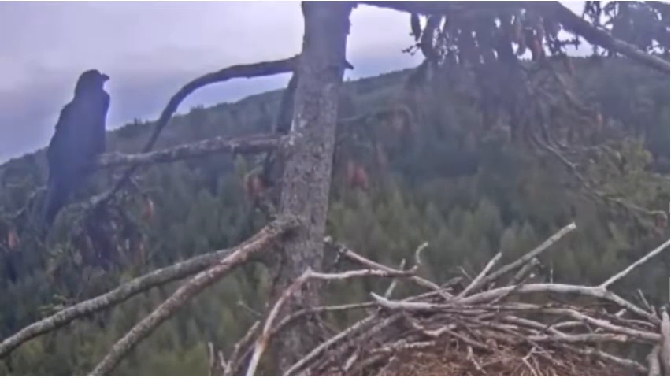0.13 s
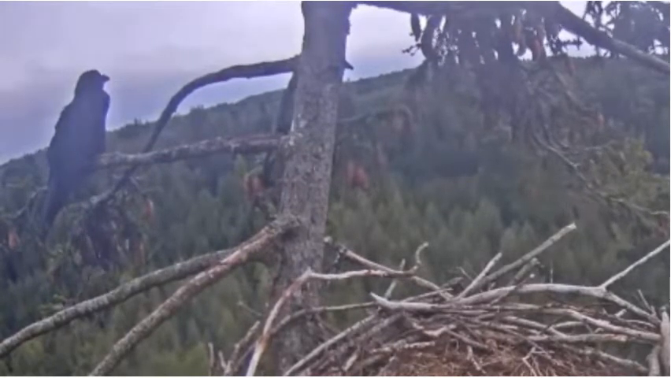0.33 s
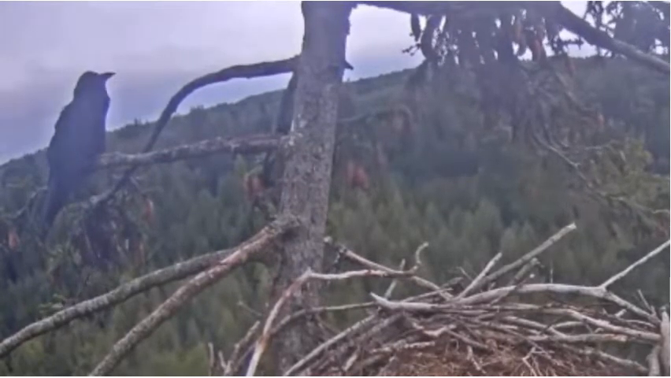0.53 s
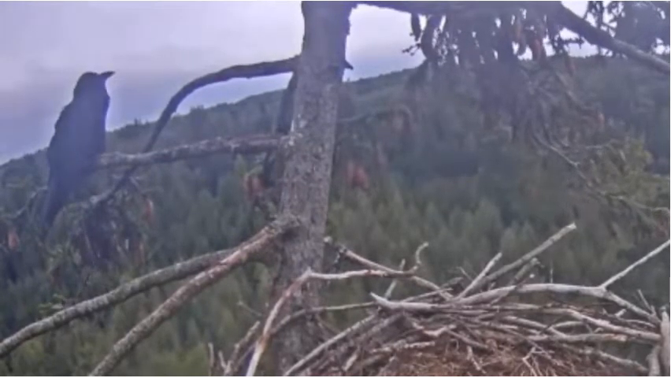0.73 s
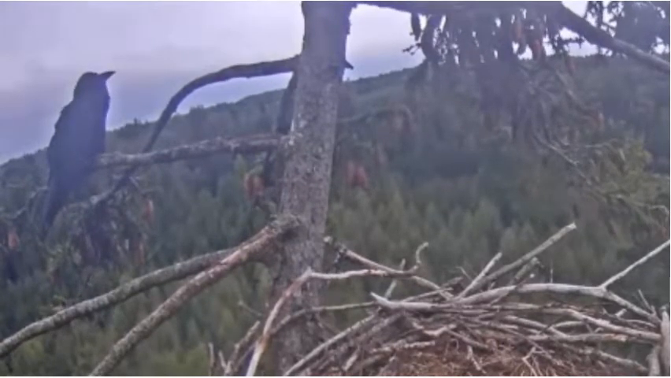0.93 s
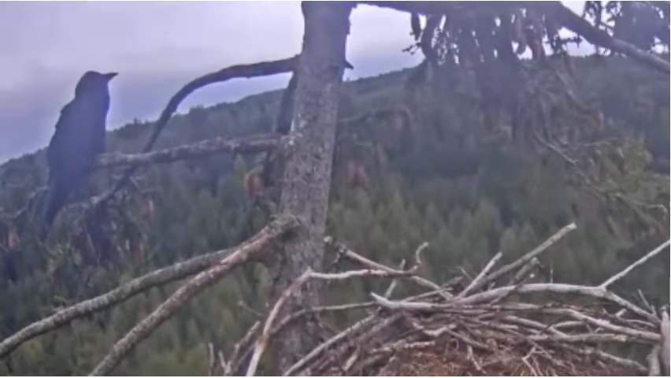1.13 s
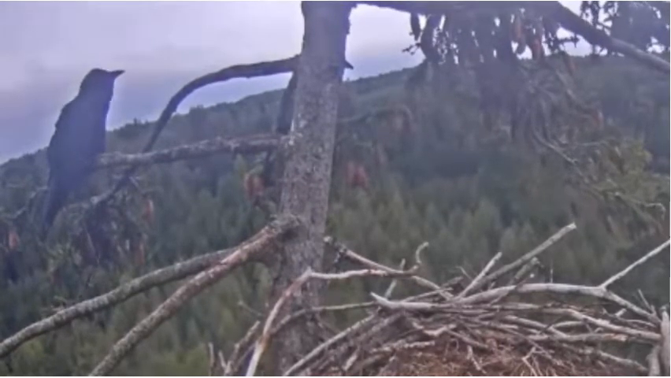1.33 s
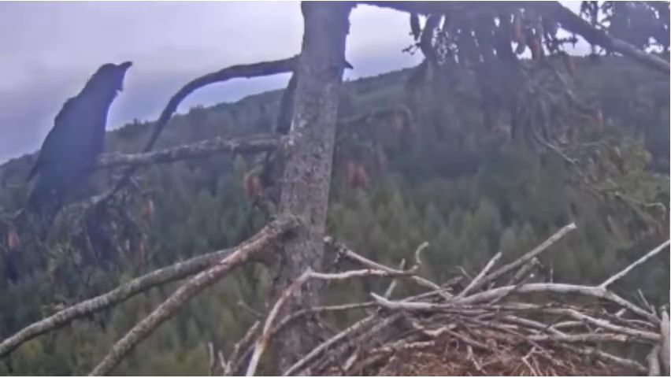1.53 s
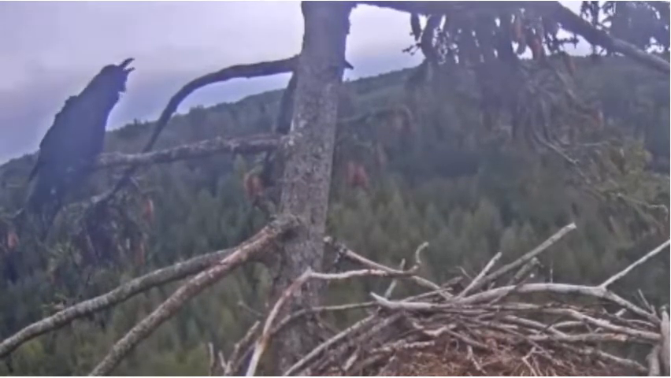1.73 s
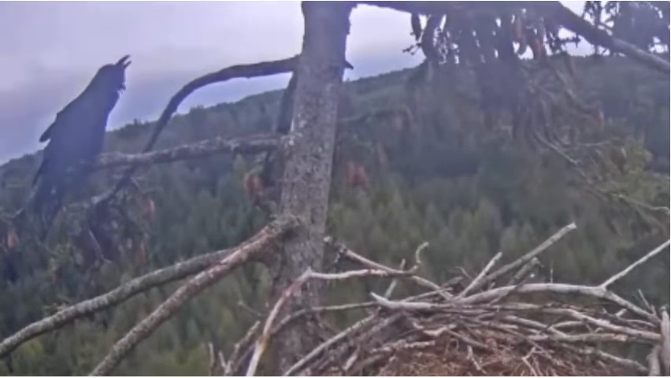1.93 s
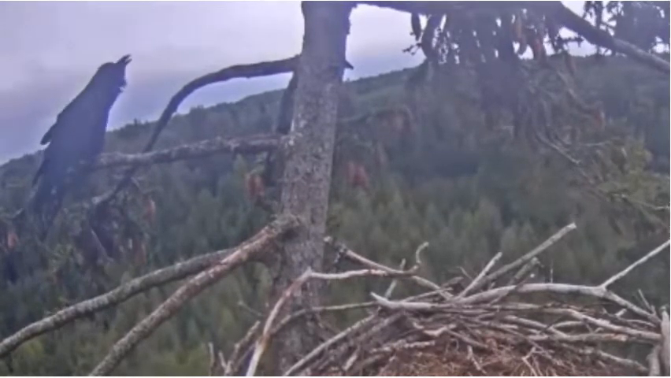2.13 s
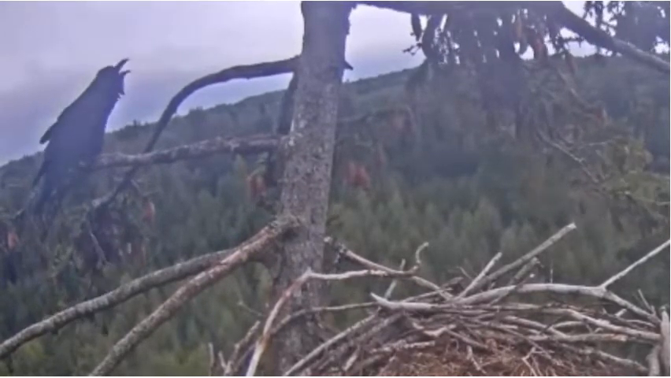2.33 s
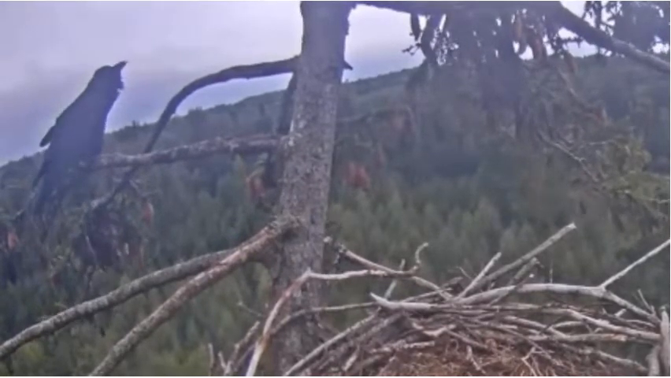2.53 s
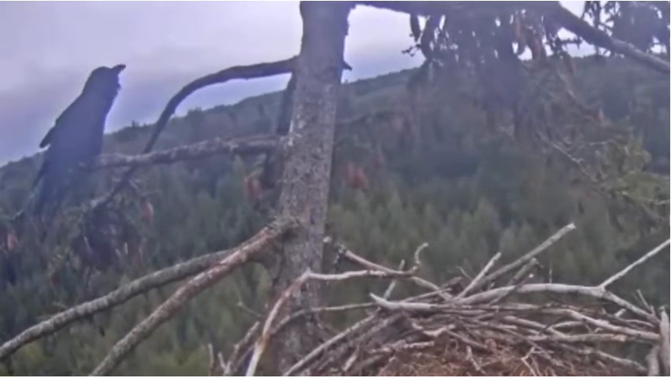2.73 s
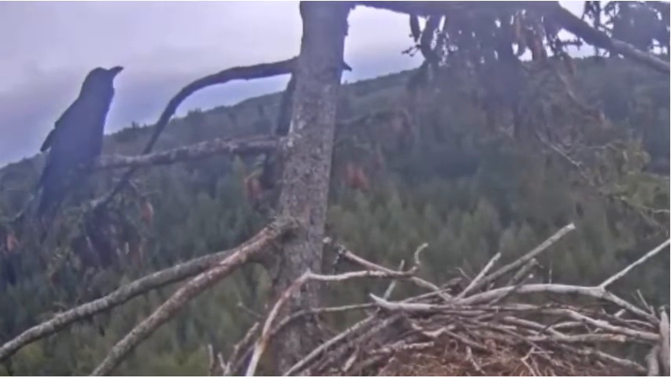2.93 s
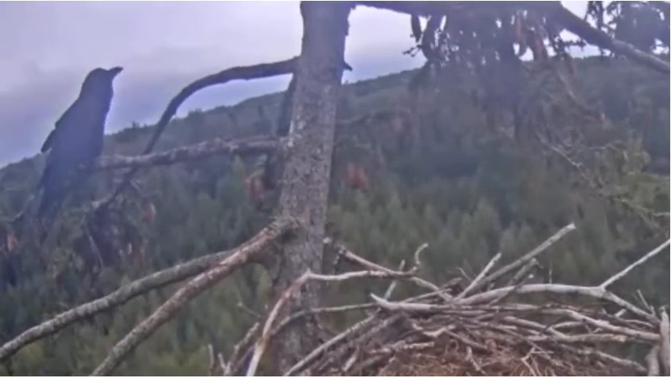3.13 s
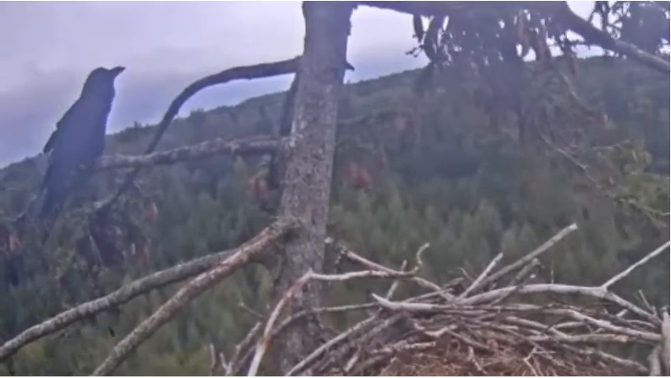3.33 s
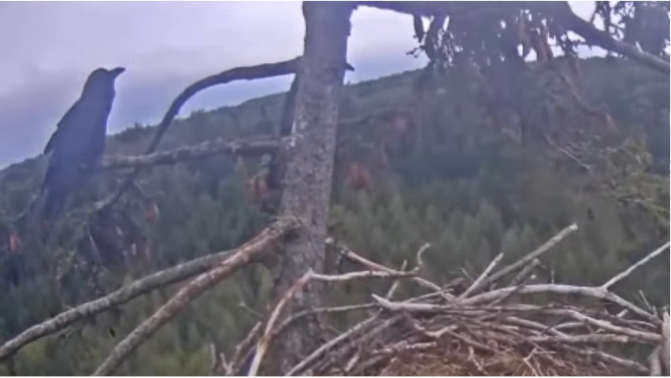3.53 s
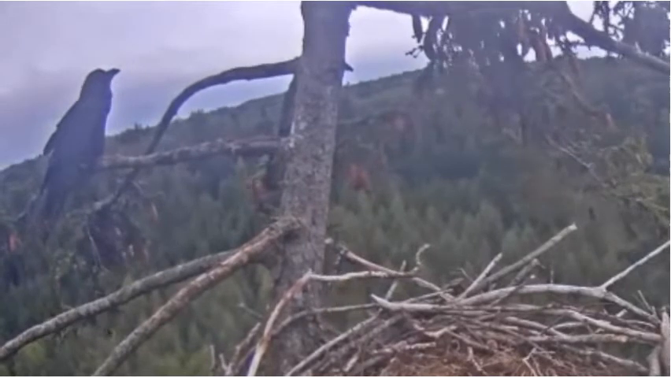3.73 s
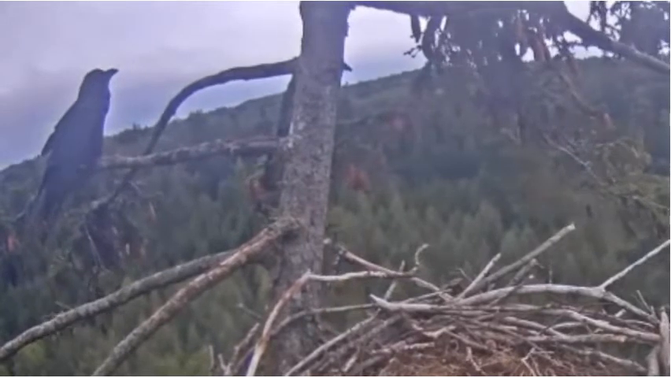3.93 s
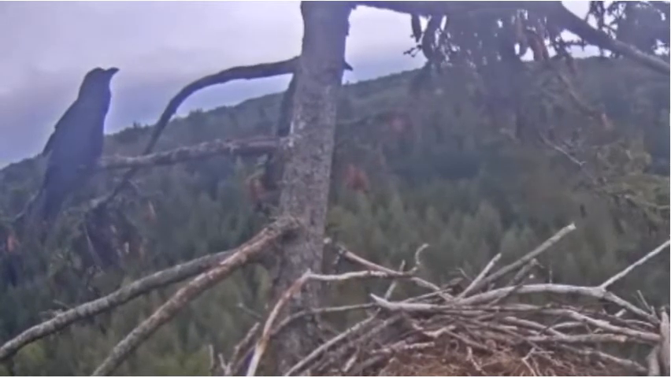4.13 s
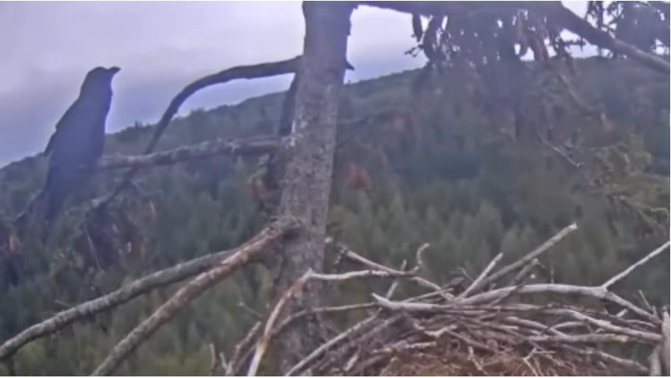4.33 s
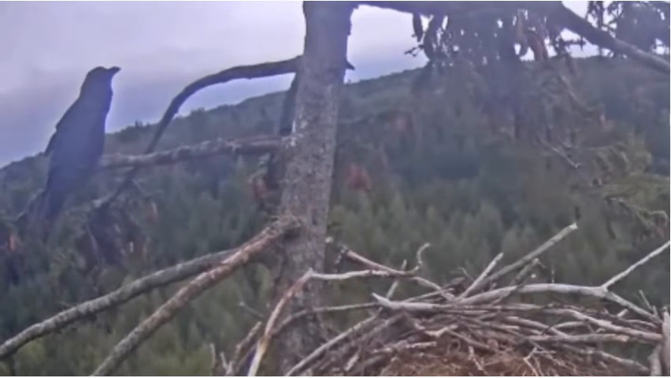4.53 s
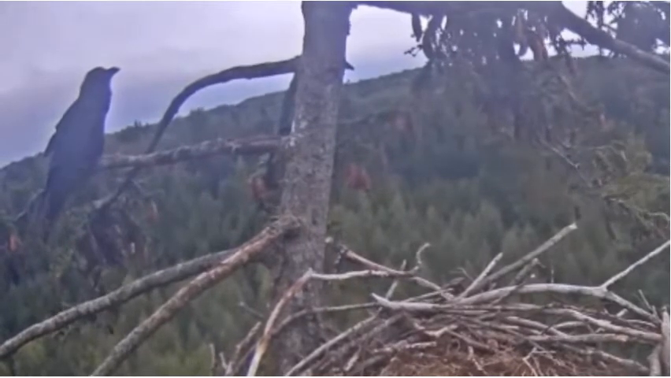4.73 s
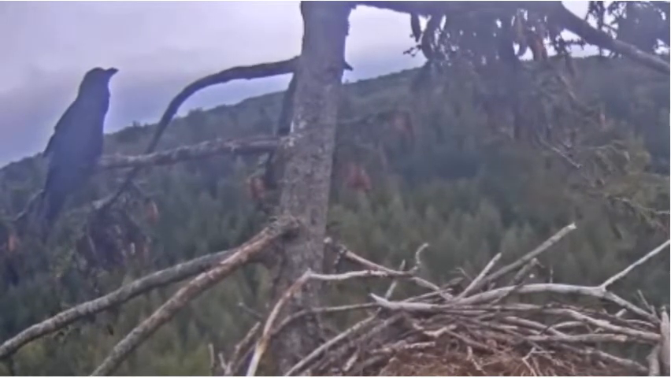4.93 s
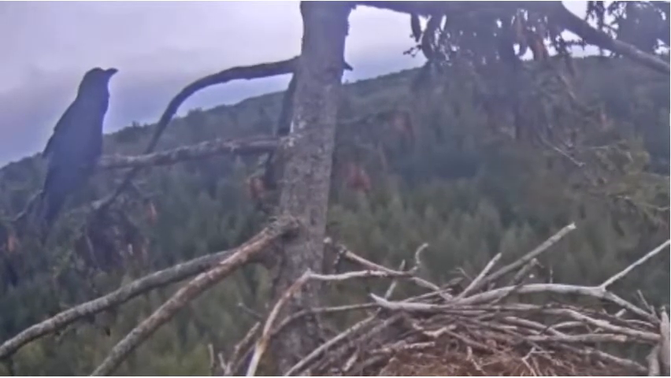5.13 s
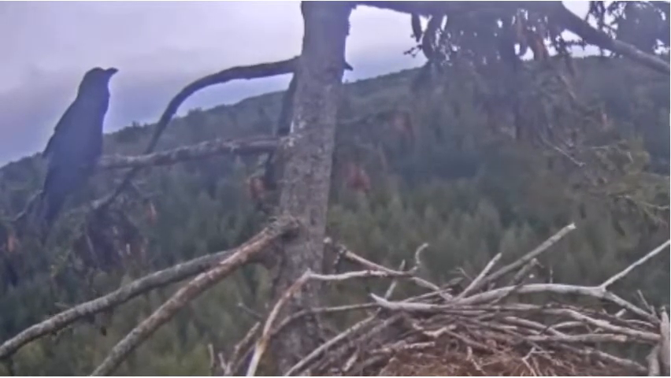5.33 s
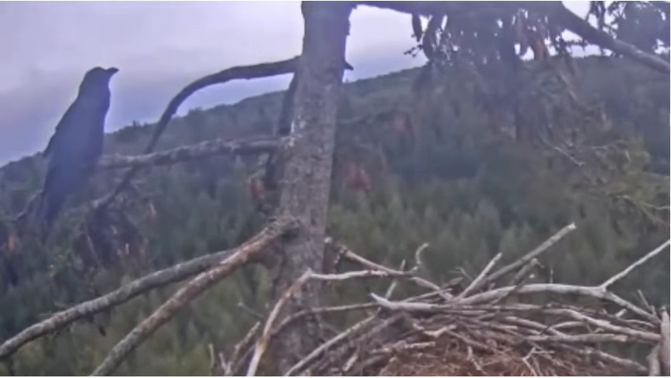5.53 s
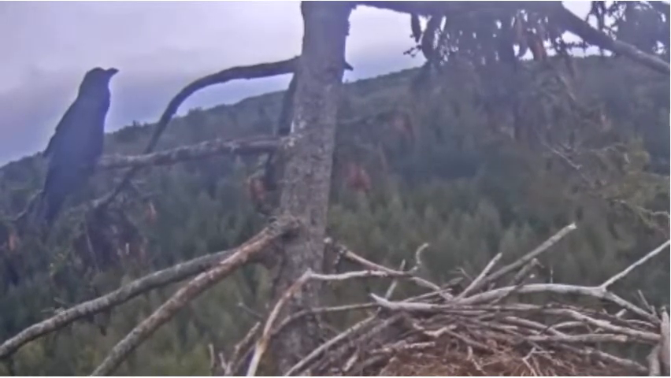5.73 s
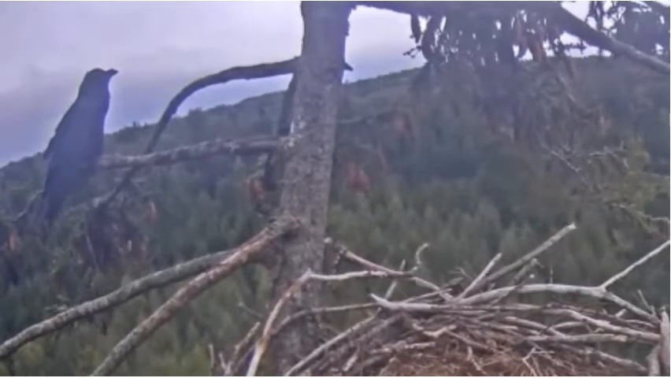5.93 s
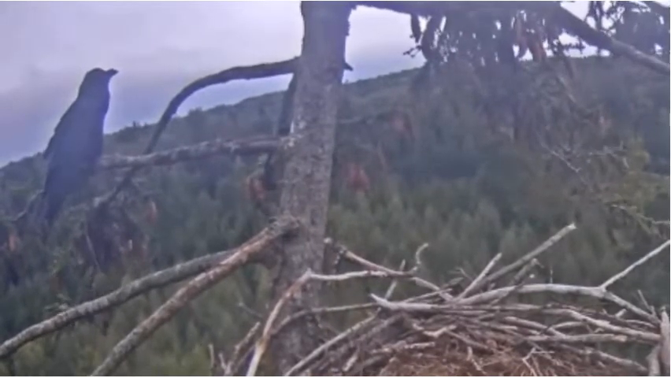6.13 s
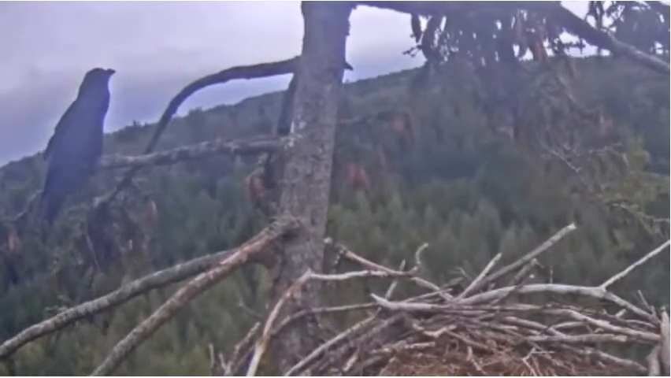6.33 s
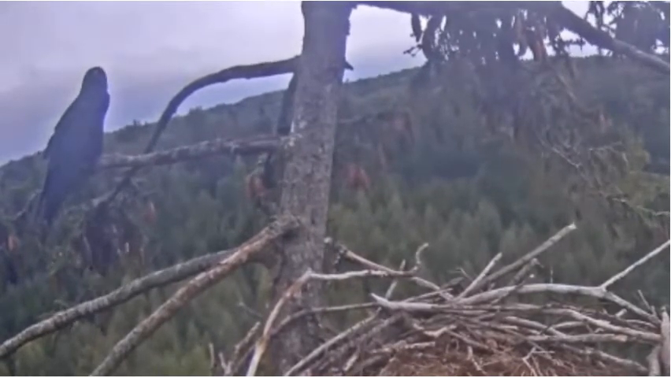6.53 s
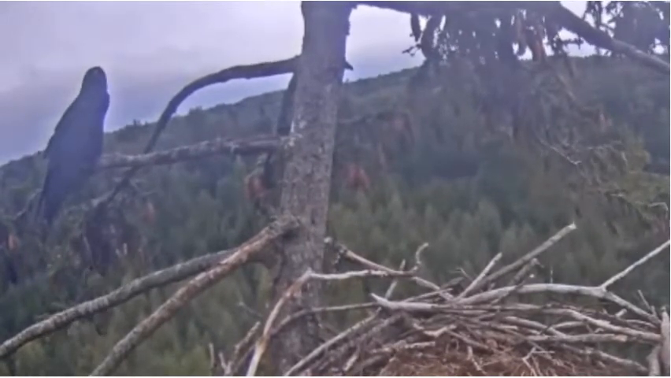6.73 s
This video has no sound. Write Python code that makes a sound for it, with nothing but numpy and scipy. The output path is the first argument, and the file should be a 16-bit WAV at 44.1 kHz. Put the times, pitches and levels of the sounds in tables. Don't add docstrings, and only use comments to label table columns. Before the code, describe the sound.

A raven close to the microphone gives two loud, rattling croaks, then another farther off answers four times more softly over steady hiss and low wind.

```python
import sys
import numpy as np
from scipy import signal
from scipy.fft import rfft, irfft, next_fast_len
from scipy.io import wavfile
from scipy.ndimage import uniform_filter1d, map_coordinates

SR = 44100
rng = np.random.default_rng(int(sys.argv[2]) if len(sys.argv) > 2 else 0)


def bounce(signal):
    frames = np.transpose(np.atleast_2d(signal))
    limited = np.clip(frames, -1, 1)
    pcm = np.round(limited * 32767).astype(np.int16)
    wavfile.write(sys.argv[1], SR, pcm)


def rack_gain(trim_db):
    fader = np.asarray(trim_db, float)
    return 10 ** (fader / 20)


N = 298998

# time in seconds, level in dB.
BUFFET_LEVEL = [(0.0, -43), (0.41, -45.5), (0.45, -36), (0.87, -47), (0.94, -40), (1.74, -44), (1.79, -35),
                (1.93, -43.5), (2.13, -33.5), (2.19, -51), (2.36, -36.5), (4.0, -34.5), (4.06, -31.5),
                (4.4, -41), (4.53, -34), (6.78, -44.5)]
# frequency in Hz, density in dB per Hz.
BUFFET_SPECTRUM = [(3.5, -36), (6.0, -2), (16, 6.5), (19, 3), (22, 1), (48, -6), (130, -23), (170, -34.5),
                   (290, -120)]
ROAR_SPECTRUM = [(47, -7.5), (80, -4), (171, -6), (259, -6.5), (290, -6), (900, -14.5), (1170, -23),
                 (1980, -120)]
HISS_SPECTRUM = [(290, -10.5), (500, -3.5), (551, -3.5), (642, -4), (884, -6), (1020, -7), (1170, -4.5),
                 (1610, -7), (2120, -3), (2340, -1), (2850, -10.5), (3610, -16), (6290, -20.5),
                 (12600, -22), (13900, -23.5)]
# centre in seconds, length in seconds, level in dB.
AIR_SHOVE = (.938, 0.019, -40.5)

# delay in seconds, level in dB.
FAR_BRANCHES = [(.0025, -15), (0.0112, -7.5), (0.071, -32), (.094, -12)]
NEAR_BRANCHES = [(.0034, -43), (0.0114, -7.5)]
# frequency in Hz, level in dB.
BRANCH_COLOUR = [(300, -33), (1200, 0), (1900, -25), (3000, -10), (6000, -7)]
# twig level in dB, twig t60 in seconds, slope level in dB,
# time the slope level holds in seconds, its fall afterwards in dB per second.
FAR_FOREST = (-15, .07, -23.5, .1, 115)
NEAR_FOREST = (-11, 0.0845, -39, 0.32, 86)
# frequency in Hz, level in dB.
FAR_SCATTER = [(300, -5.5), (1000, -3.5), (1170, -1.5), (1400, -1), (1900, 4.5), (2800, -6.5), (4500, -11),
               (8000, -15)]
NEAR_SCATTER = [(300, -5), (950, -5.5), (1150, -5.5), (1300, -8), (1500, 1.5), (1900, 1.5), (2800, 8),
                (4300, 9), (8000, 15)]

# centre in Hz, width in Hz, level in dB.
FAR_OPEN = [(473, 330, -10), (1140, 540, 3), (1780, 660, -17.5), (2340, 800, -9.5), (2824, 280, -3.5),
            (3740, 410, -14.5), (4630, 980, -15), (6100, 1700, -26.5)]
FAR_SHUT = [(348, 770, -21), (1180, 415, 5), (2610, 390, -0.5), (4070, 830, -11), (6100, 1200, -20)]
FAR_SLACK = [(330, 970, -13.5), (1237, 340, 6), (1870, 280, -14), (2570, 430, -9.5), (4320, 2000, -23.5),
             (6030, 1400, -29)]
NEAR_OPEN = [(470, 310, -11), (1150, 288, 4.5), (1900, 450, -9), (2667, 255, -12), (3960, 1500, -37.5),
             (5320, 1400, -43)]
NEAR_SHUT = [(356, 260, -10), (1186, 284, 3), (2540, 390, -20.5), (4140, 610, -36)]
NEAR_SLACK = [(314, 410, -13.5), (1266, 256, 4), (1950, 390, -18), (2530, 320, -19), (4100, 1150, -42)]

# first buzz in seconds, level in dB, pitch in Hz.
FAR_CROAKS = [
    (3.342, -32.5, 485.5),
    (3.744, -31, 483.5),
    (4.18, -30.5, 476.7),
    (4.619, -31, 472),
]
NEAR_CROAKS = [
    (1.8805, -16, 485.4),
    (2.357, -16, 482),
]
# length in seconds, dB over the croak, pitch ratio, closing knock in dB over it.
FAR_SHAPE = [
    (.011, -.3, 1.01, -12),
    (.012, 0.63, 1.01, -7),
    (.012, -1.5, .985, -4.5),
]
NEAR_SHAPE = [
    (0.0099, -0.5, .985, -4),
    (.0115, 0.7, 1.008, -0.7),
    (.011, 1.5, .978, -11),
]
# start in seconds, length in seconds, level in dB, start pitch in Hz, fade in dB.
FAR_ENDINGS = [
    (3.3279, .0035, -32.5, 415, -3),
    (3.406, 0.02, -29, 394, -12),
    (3.81, .019, -30, 404.4, -10.5),
    (4.246, .013, -31, 415, -3.5),
    (4.687, .013, -29, 389, -8),
]
NEAR_ENDINGS = [
    (1.9422, .028, -13, 421.2, -3.5),
    (1.976, 0.0075, -28, 412, -12),
    (2.421, .0215, -15, 426.6, -3.5),
]
FAR_CLICK_S = [3.325, 3.729, 4.166, 4.605]
NEAR_CLICK_S = [1.867, 2.342]
FAR_LEADS_S = [.0265, 0]
NEAR_LEADS_S = [.034, .026, 0]
FAR_CLICK_DB = [-7.8, -0.5]
NEAR_CLICK_DB = [-16.5, -3.5, 2.5]
# time in seconds, treble level in dB.
FAR_FACING = [(3.35, -2), (3.78, -0.5), (4.2, -0.5), (4.65, -7)]

# frequency in Hz, level in dB.
TOP_EDGE = [(13940, 0), (13960, -10), (14250, -13), (14400, -22), (14430, -60)]
# start in seconds, end in seconds.
LOST_PACKETS = [
    (.935, .938),
    (1.958, 1.963),
    (2.2159, 2.2241),
    (6.439, 6.444),
]


def along(points, hz):
    f, value = np.transpose(points)
    return np.interp(np.log(hz + 1), np.log(f + 1), value)


def filtered(x, response):
    m = next_fast_len(N + SR)
    return irfft(rfft(x, m) * response(np.fft.rfftfreq(m, 1 / SR)), m)[:N]


def wobble(rate):
    knots = rng.standard_normal(int(N * rate / SR) + 4)
    return map_coordinates(knots, [np.arange(N) * rate / SR])


def noise(spectrum):
    x = filtered(rng.standard_normal(N), lambda hz: rack_gain(along(spectrum, hz)))
    return x / np.std(x)


def preamp_hiss():
    return rack_gain(-51 + 0.37 * wobble(2.66)) * noise(HISS_SPECTRUM)


def wind():
    t = np.arange(N) / SR
    buffet_db = np.interp(t, *np.transpose(BUFFET_LEVEL))
    thumps = rack_gain(buffet_db + 0.53 * wobble(3.55)) * noise(BUFFET_SPECTRUM)
    at, length, db = AIR_SHOVE
    thumps = thumps + rack_gain(db) * np.exp(-(2 * (t - at) / length) ** 2)

    smooth_s = 0.86
    gust_db = uniform_filter1d(buffet_db - buffet_db.mean(), size=round(smooth_s * SR))
    roar_db, gust_share = -51.5, 0.53
    flutter_db = 1.5 * wobble(9)
    return thumps + rack_gain(roar_db + gust_share * gust_db + flutter_db) * noise(ROAR_SPECTRUM)


def woods(voice, branches, forest, scatter):
    t = np.arange(SR // 2) / SR
    twigs_db, twigs_t60, slope_db, hold_s, fall_db_per_s = forest
    twigs = rack_gain(twigs_db - 60 * t / twigs_t60)
    slope = rack_gain(slope_db - fall_db_per_s * np.maximum(t - hold_s, 0))
    clumps = rack_gain(1.5 * wobble(60)[:len(t)] - 20.5)
    trees = (t > .002) * (twigs + slope) * clumps * rng.standard_normal(len(t))

    bounced = sum(rack_gain(echo_db) * np.roll(voice, round(s * SR)) for s, echo_db in branches)
    bounced = filtered(bounced, lambda hz: rack_gain(along(BRANCH_COLOUR, hz)))
    scattered = filtered(signal.fftconvolve(voice, trees)[:N], lambda hz: rack_gain(along(scatter, hz)))
    sway = 6 * wobble(40)
    scattered = map_coordinates(scattered, [np.arange(N) + sway])
    return voice + bounced + scattered


def syrinx(runs, gain_db):
    flow, puffs = np.zeros(N), np.zeros(N)
    t = np.arange(SR // 20) / SR
    k = np.arange(-8, 9)
    for s, length, db, start_hz, end_hz, fade_db in runs:
        cycles = np.cumsum(np.interp(t, [0, length], [start_hz, end_hz])) / SR
        chance = rng.standard_normal((2, 14))
        times = np.interp(np.arange(14), cycles, t)
        live = times <= length
        jitter_s = .005 * chance[0] / start_hz
        at = (s + times + jitter_s)[live] * SR
        size = rack_gain(db + gain_db + fade_db * times / length + .7 * chance[1])[live]
        taps = np.round(at)[:, None] + k
        pulses = np.sinc(taps - at[:, None]) * np.hanning(19)[1:-1]
        np.add.at(flow, taps.astype(int), -size[:, None] * pulses)
        puffs[np.round(at).astype(int)] = size
    gate = signal.fftconvolve(puffs, np.hanning(60))[:N]
    rasp = filtered(rng.standard_normal(N), lambda hz: rack_gain(along([(1500, -36), (3500, -19)], hz)))
    return flow + gate * rasp


def throat(x, modes):
    def response(f):
        total = 0
        for k, (centre, width, db) in enumerate(modes):
            band = 1j * f * width / (centre * centre - f * f + 1j * f * width)
            total = total + (-1) ** k * rack_gain(db) * band ** 2
        return total
    return filtered(x, response)


def croaks(rows, shape, clicks, endings, modes, period_s, sag_hz, slack_hz_per_s, closing_hz, fade_db):
    open_modes, shut_modes, slack_modes = modes
    buzzes, closings = [], []
    for s, db, hz in rows:
        for k, (length, up_db, ratio, knock_db) in enumerate(shape):
            start, pitch = s + k * period_s, hz * ratio
            buzzes.append((start, length, db + up_db, pitch, pitch - sag_hz, fade_db))
            closings.append((start + length, 2.1 / closing_hz, db + knock_db, closing_hz, closing_hz, -4))

    hard_clicks, dull_clicks = [], []
    last_s, leads_s, clicks_db = clicks
    for s, (_, db, _) in zip(last_s, rows):
        taps = [(s - lead, .5 / closing_hz, db + up_db, closing_hz, closing_hz, 0)
                for lead, up_db in zip(leads_s, clicks_db)]
        dull_clicks += taps[:-1]
        hard_clicks.append(taps[-1])

    slack = [(s, length, db, hz, hz - slack_hz_per_s * length, fade) for s, length, db, hz, fade in endings]
    shut_voice = throat(syrinx(hard_clicks + closings, gain_db=32.5), shut_modes)
    slack_voice = throat(syrinx(slack + dull_clicks, gain_db=33.5), slack_modes)
    open_voice = throat(syrinx(buzzes, gain_db=31.5), open_modes)
    return shut_voice + slack_voice - open_voice


def far_raven():
    clicks = (FAR_CLICK_S, FAR_LEADS_S, FAR_CLICK_DB)
    voice = croaks(FAR_CROAKS, FAR_SHAPE, clicks, FAR_ENDINGS, (FAR_OPEN, FAR_SHUT, FAR_SLACK),
                   period_s=.0225, sag_hz=11.4, slack_hz_per_s=3640, closing_hz=397.5, fade_db=-1.5)
    treble = filtered(voice, lambda hz: hz > 3300)
    facing = rack_gain(np.interp(np.arange(N) / SR, *np.transpose(FAR_FACING)))
    return woods(voice + (facing - 1) * treble, FAR_BRANCHES, FAR_FOREST, FAR_SCATTER)


def near_raven():
    clicks = (NEAR_CLICK_S, NEAR_LEADS_S, NEAR_CLICK_DB)
    voice = croaks(NEAR_CROAKS, NEAR_SHAPE, clicks, NEAR_ENDINGS, (NEAR_OPEN, NEAR_SHUT, NEAR_SLACK),
                   period_s=.022, sag_hz=0.3, slack_hz_per_s=7300, closing_hz=412, fade_db=2.0)
    return woods(voice, NEAR_BRANCHES, NEAR_FOREST, NEAR_SCATTER)


def scene():
    return (wind() + far_raven() + near_raven())[None]


def band_limit(x):
    return signal.sosfilt(signal.butter(12, 14860, fs=SR, output="sos"), x)


def record(dry):
    x = dry[0] + preamp_hiss()
    offset = .0123
    x = filtered(x, lambda hz: rack_gain(along(TOP_EDGE, hz))) + offset
    t = np.arange(N) / SR
    for start, end in LOST_PACKETS:
        received = 1.0 * ((t < start) | (t >= end))
        x = x * uniform_filter1d(received, size=2)
    return band_limit(x[None])


dry = scene()
out = record(dry)
bounce(out)
```